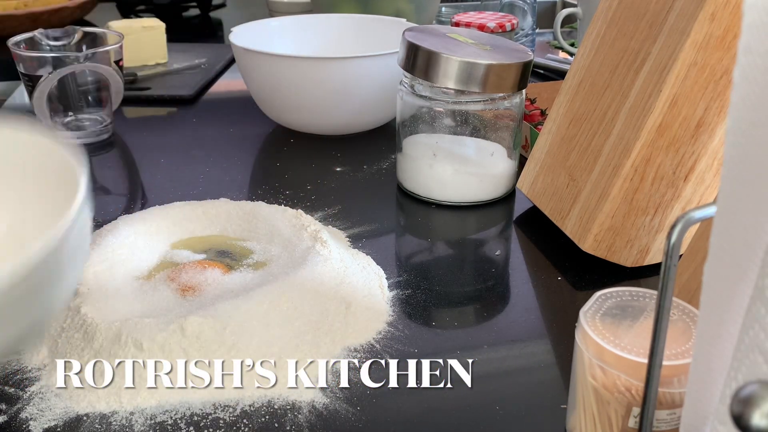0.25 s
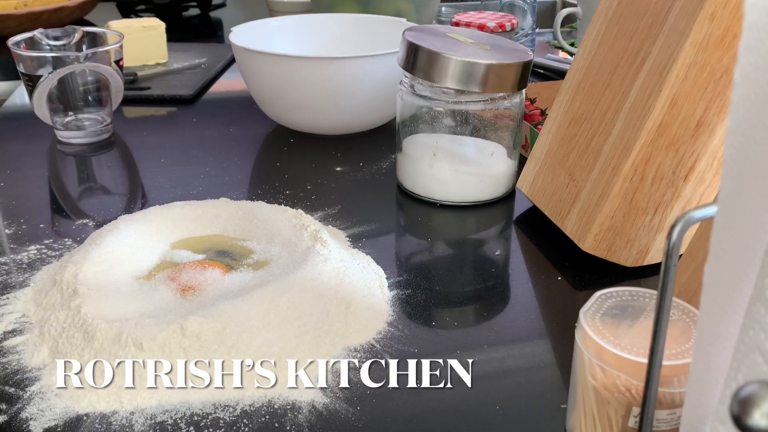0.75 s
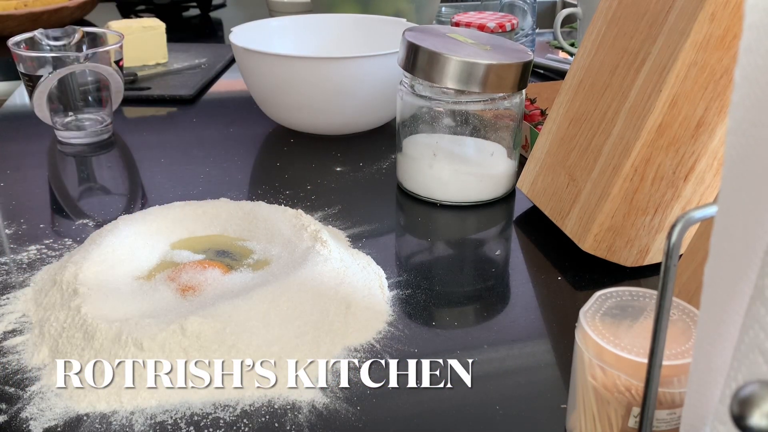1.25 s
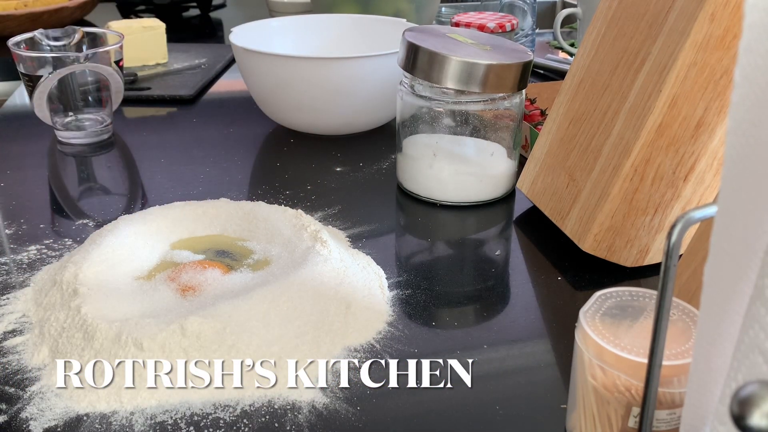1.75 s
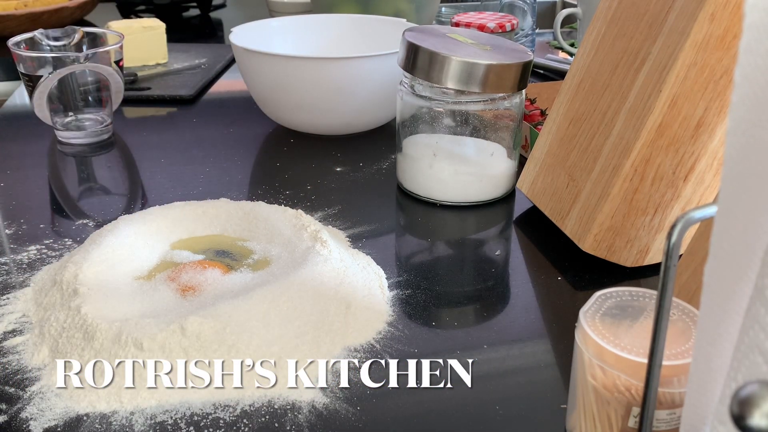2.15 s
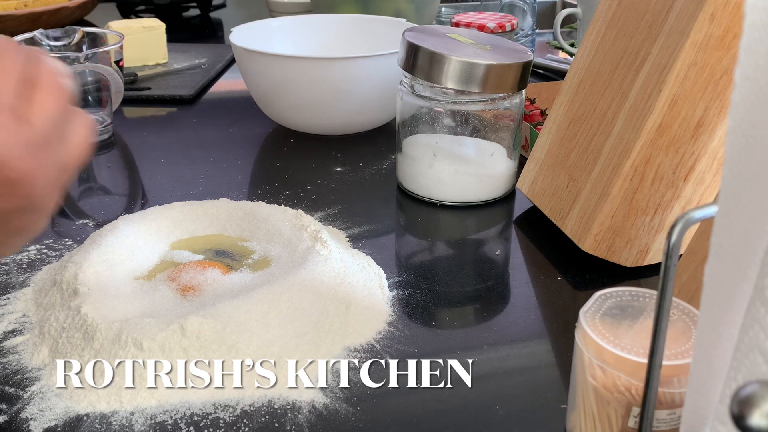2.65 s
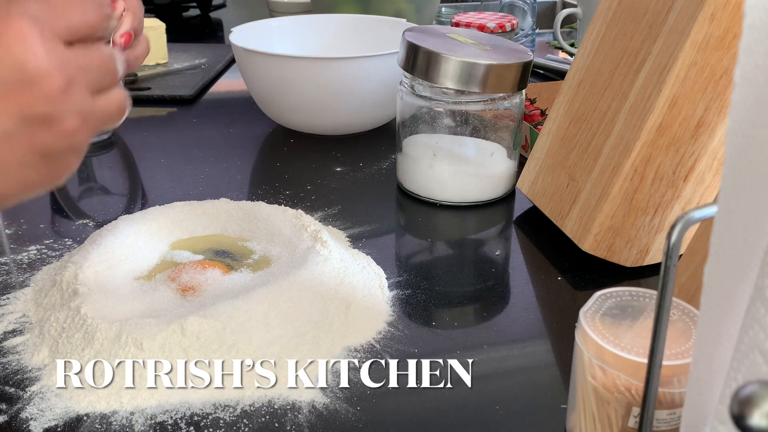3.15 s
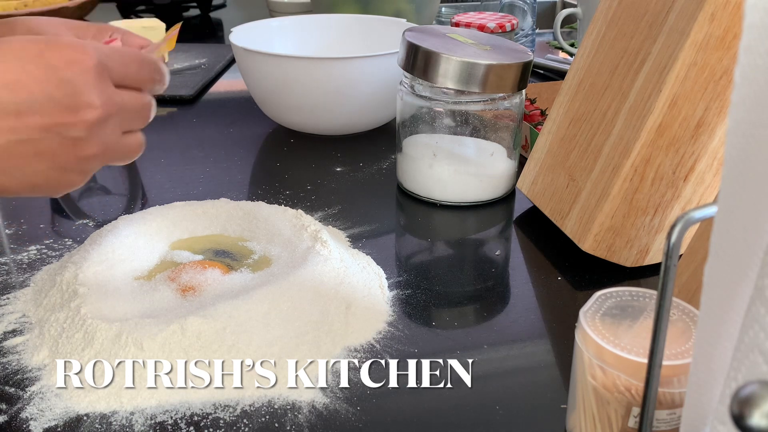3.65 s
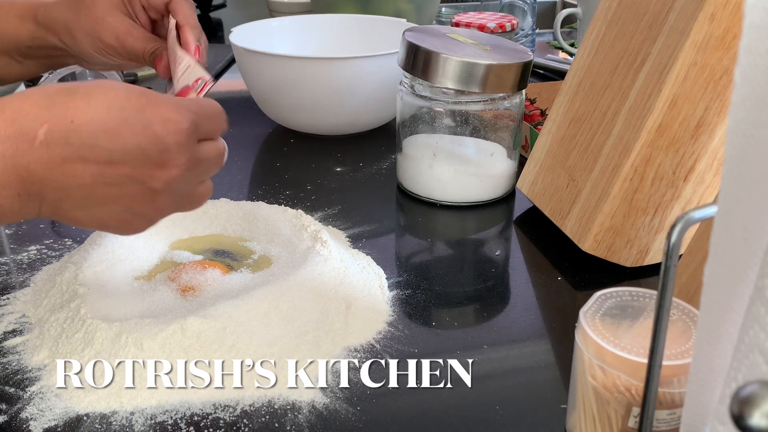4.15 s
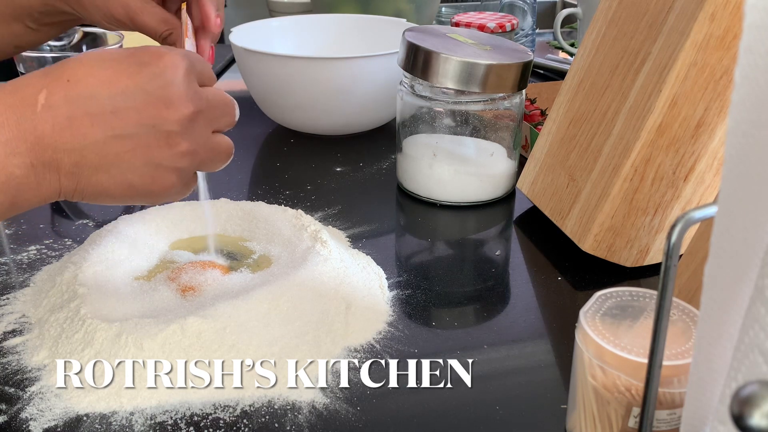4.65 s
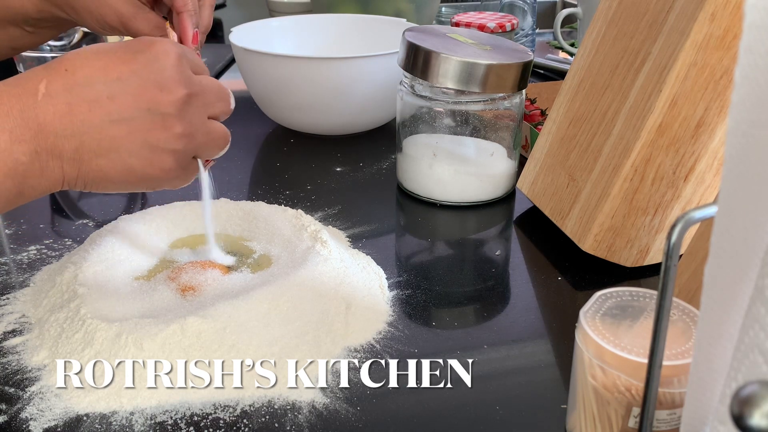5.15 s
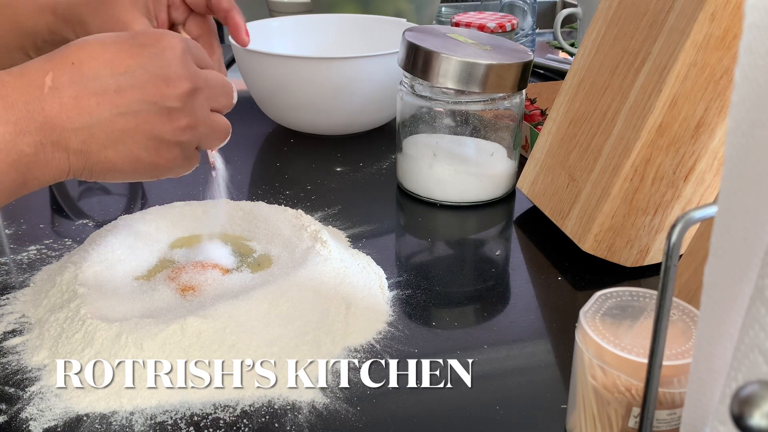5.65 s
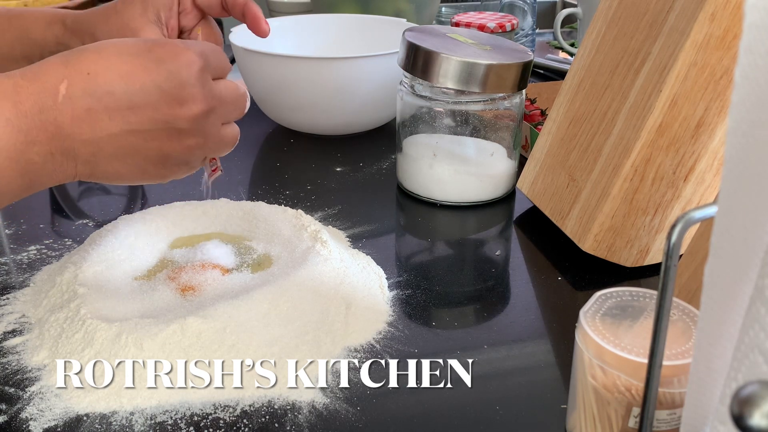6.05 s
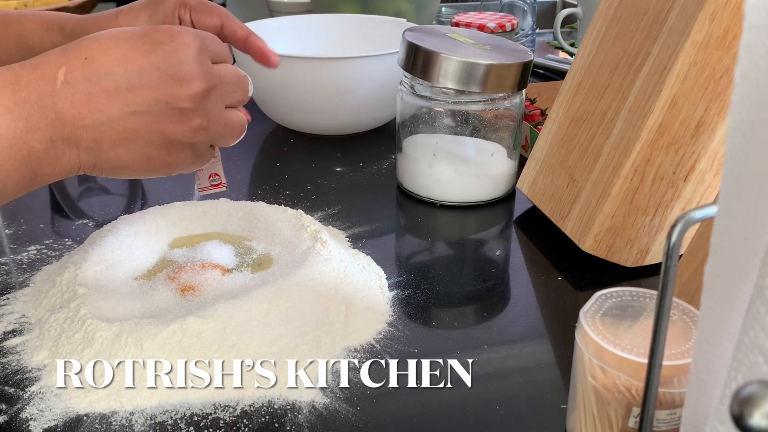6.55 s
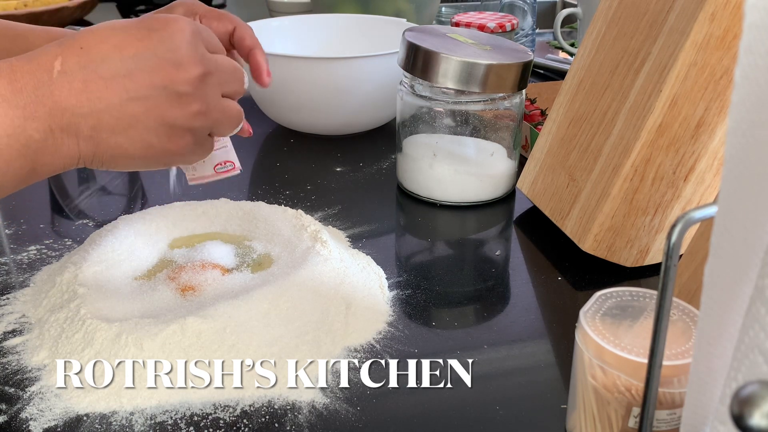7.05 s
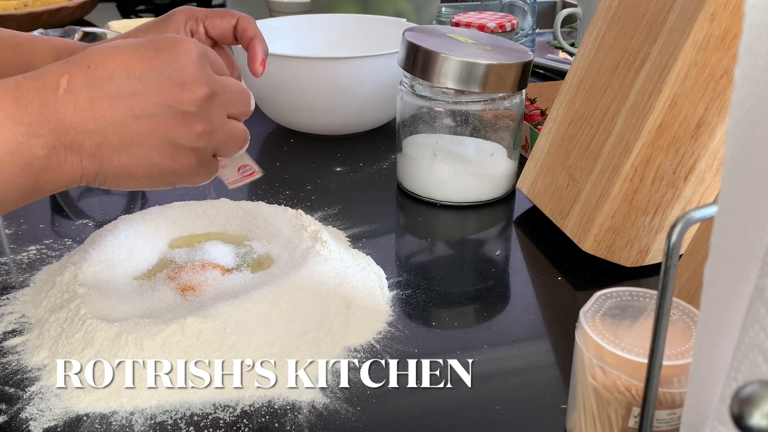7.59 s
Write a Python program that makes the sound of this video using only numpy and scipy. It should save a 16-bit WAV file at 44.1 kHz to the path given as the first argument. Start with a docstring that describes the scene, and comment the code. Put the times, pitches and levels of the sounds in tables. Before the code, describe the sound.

A bowl is set down on a stone counter with a quick clatter and a brief ring. Much quieter paper sounds follow: a small sachet crackles, rips open in one short pull and lets out a soft hiss of sugar. It ends with busier crinkling as the last grains are shaken loose. Everything is heard up close over a kitchen's faint low hum and short echo.

```python
"""In a softly humming, echoing kitchen, a carried bowl clinks faintly, then knocks on the stone counter
and rattles to rest (0.7 s). Fingers pick up a small paper sachet, which crinkles and snaps (1.3 s).
They tear off its top (2.7 s), pinch it open and pour hissing sugar onto soft flour (3.9 to 6 s).
Last, they shake and crinkle the final grains out. Two close microphone ports hear it all."""
import sys
import numpy as np
from scipy import signal
from scipy.fft import rfft, irfft
from scipy.io import wavfile
from scipy.ndimage import uniform_filter1d

SR = 44100
rng = np.random.default_rng(int(sys.argv[2]) if len(sys.argv) > 2 else 0)


def digitize_waveform(pressure):
    """Quantize a signal to 16-bit integers and store it at the path in sys.argv[1].

    Rows of a 2-D input are taken as channels; values are limited to [-1, 1].
    """
    field = np.atleast_2d(pressure).T
    bounded = np.clip(field, -1, 1)
    quanta = np.round(bounded * 32767).astype(np.int16)
    wavfile.write(sys.argv[1], SR, quanta)


N = 344970
TIME = np.arange(N) / SR
ONE_SECOND = np.arange(SR) / SR
HZ = np.fft.rfftfreq(N, 1 / SR)


def gain_of(db):
    """Turns decibels into a number to multiply a sound by."""
    return 10 ** (np.asarray(db) / 20)


def evened(x):
    """Scales a signal to an average power of 1."""
    return x / np.sqrt(np.mean(x ** 2) + 1e-20)


def look_up(table, hz):
    """Reads between the rows of a frequency table, giving each octave equal room."""
    row_hz, value = np.transpose(table)
    return np.interp(np.log(hz + 1), np.log(row_hz + 1), value)


def add(mix, start, sound):
    """Adds a sound to the mix, starting at a time in seconds."""
    part = mix[:, round(start * SR):][:, :sound.shape[-1]]
    part += sound[..., :part.shape[-1]]


def noise(spectrum):
    """Two unrelated noises, left and right, with the same tone colour."""
    return evened(irfft(rfft(rng.standard_normal((2, N))) * spectrum, N))


def swell(peak, length):
    """A smooth rise and fall around the peak time."""
    return np.exp(-(2 * (TIME - peak) / length) ** 2)


def loudness(curve, fade_s=0.18):
    """Follows a table of levels over time, fading in before it and out after it."""
    times, db = np.transpose(curve)
    outside_s = np.maximum(np.maximum(times[0] - TIME, TIME - times[-1]), 0)
    return gain_of(np.interp(TIME, times, db) - 60 * outside_s / fade_s)


def grains(per_s, length_s, spread_db):
    """Countless tiny bursts of uneven size: multiply a noise by this to make it gritty."""
    sizes = gain_of(spread_db * np.minimum(rng.exponential(1, N), 4.5))
    power = sizes ** 2 * (rng.random(N) < per_s / SR)
    power = np.abs(uniform_filter1d(power, max(int(length_s * SR), 2)))
    average = np.abs(uniform_filter1d(power, SR // 8))
    return np.sqrt(power / (average + 1e-9))


# tone colour of the quiet kitchen: (frequency [Hz], level [dB])
ROOM_COLOUR = [(20, -22), (40, -3.5), (65, 0.5), (130, -4.5), (220, 1.5), (330, -11.5), (600, -19.5),
               (1100, -21), (1800, -26), (5000, -26.5), (12000, -26.5), (16000, -30.5)]

def room_hum(level_db=-73.5):
    """The room hums low under a faint hiss the whole time."""
    return gain_of(level_db) * noise(gain_of(look_up(ROOM_COLOUR, HZ)))


# how long the kitchen echoes: (frequency [Hz], time to fade by 60 dB [s])
ECHO_FADE = [(100, 0.18), (300, 0.45), (1100, 0.63), (2500, 0.79), (5000, 0.24), (9000, 0.29),
             (16000, 0.14)]

def kitchen_echo(sound, build_up_s, treble_db):
    """Tiles and cupboards throw back a blur of echoes, each pitch dying at its own speed."""
    t = ONE_SECOND
    echoes = rng.standard_normal((2, SR)) * (rng.random((2, SR)) < .12)
    hz, frame_s, spectrum = signal.stft(echoes, SR, nperseg=256)
    colour_db = treble_db * np.clip(np.log2((hz + 1) / 2000) / 2, 0, 1)
    spectrum *= gain_of(colour_db[:, None] - 60 * frame_s / look_up(ECHO_FADE, hz)[:, None])
    onset = 1 - np.exp(-np.maximum(t - .003, 0) / build_up_s)
    tail = signal.istft(spectrum, SR, nperseg=256)[1][:, :SR] * onset
    tail /= np.linalg.norm(echoes[0] * gain_of(-60 * t / 0.73))
    return signal.fftconvolve(sound, tail, axes=1)[:, :N]


def blow(rise_s=0.00069, decay_s=0.0042):
    """The force of one hit jumps up and quickly dies away."""
    return np.exp(-ONE_SECOND / decay_s) * (1 - np.exp(-ONE_SECOND / rise_s))


def ring(tones, rise_s):
    """A struck object's tones start together and fade; left and right are a quarter cycle apart."""
    t = ONE_SECOND
    wave = sum(gain_of(db - 60 * t / fade_s) * np.exp(2j * np.pi * hz * t) for hz, db, fade_s in tones)
    wave *= np.sqrt(2) * (1 - np.exp(-t / rise_s))
    return np.array([wave.imag, wave.real])


# faint clinks of the carried bowl: (time [s], level [dB])
CLINKS = [(.09, -72), (0.184, -52.5), (.224, -74.5)]
# the tones in a clink: (frequency [Hz], level [dB], time to fade by 60 dB [s])
CLINK_TONES = [(1100, -10, .12), (2730, 0, .05), (2755, -13, .25), (4800, -13, .1), (6690, -7, .12)]

def clinks(tick_db=-4, ring_db=-7):
    """Each light touch on the carried bowl makes a noisy tick and a short ring."""
    sound = np.zeros((2, N))
    ringing = gain_of(ring_db) * ring(CLINK_TONES, rise_s=0.0013)
    for start, db in CLINKS:
        tick = gain_of(tick_db) * blow() * rng.standard_normal((2, SR))
        add(sound, start, gain_of(db) * (tick + ringing))
    return sound


def flexing(sound, spread_db=3.5, patch_hz=400, patch_s=.022):
    """Bending paper keeps changing which pitches it favours, in random drifting patches."""
    spectrum = signal.stft(sound, nperseg=512, noverlap=384)[2]
    patches = rng.standard_normal(spectrum.shape[1:])
    for axis, size in enumerate([patch_hz * 512 / SR, patch_s * SR / 128]):
        for _ in range(2):
            patches = uniform_filter1d(patches, max(round(size), 2), axis)
    spectrum *= gain_of(spread_db * evened(patches))
    return evened(signal.istft(spectrum, nperseg=512, noverlap=384)[1][:, :N])


# tone colour of the paper: (frequency [Hz], level [dB])
PAPER_COLOUR = [(100, -18.5), (300, -11.5), (600, -8.5), (1000, -1.5), (2000, 0), (4200, 3.5), (6000, 0.5),
                (8500, 2.5), (10500, 1), (13500, -2), (15800, -7.5)]

def paper_noise(share=1, right_delay_s=.00018):
    """Noise coloured by the sachet. It is held to the left, so its lower tones arrive there first."""
    left, unrelated = rfft(noise(gain_of(look_up(PAPER_COLOUR, HZ)) * share))
    likeness = look_up([(4500, .65), (6500, 0)], HZ)
    delayed = left * np.exp(-2j * np.pi * HZ * right_delay_s)
    right = likeness * delayed + np.sqrt(1 - likeness ** 2) * unrelated
    return flexing(irfft(np.array([left, right]), N))


def paper_bands(body_top_hz=2200, crackle_top_hz=7000):
    """Paper noise in three ranges: low body, middle crackle and high fizz."""
    above_body = 1 / (1 + (body_top_hz / (HZ + 1)) ** 6)
    above_crackle = 1 / (1 + (crackle_top_hz / (HZ + 1)) ** 8)
    shares = [1 - above_body, above_body * (1 - above_crackle), above_crackle]
    return [paper_noise(np.sqrt(share)) for share in shares]


def blend(bands, body_db, fizz_db):
    """Mixes the paper's three ranges, turning body and fizz up or down against the crackle."""
    body, crackle, fizz = bands
    return gain_of(body_db) * body + crackle + gain_of(fizz_db) * fizz


# soft swells of hiss as the bowl rattles and settles, and later as the sachet is handled:
# (peak time [s], length [s], level [dB])
HISS_SWELLS = [(0.639, 0.03, -59.5), (0.83, 0.2, -59), (1.159, 0.068, -57.5), (2.244, 0.02, -42.5),
               (2.553, 0.05, -46), (3.045, 0.036, -51), (3.41, 0.089, -56.5), (3.95, 0.051, -53),
               (4.404, 0.17, -56), (5.235, 0.051, -55), (5.35, .04, -59), (5.665, 0.075, -51.5),
               (6.231, 0.052, -54), (6.349, 0.056, -47), (6.839, 0.018, -49), (6.981, 0.038, -46),
               (7.522, 0.09, -50.5)]
# sliding fingers: (peak time [s], length [s], frequency [Hz], spread to each side [Hz], level [dB])
RUBS = [(0.671, 0.074, 3230, 690, -60.5), (1.573, 0.22, 3400, 900, -57.5), (2.247, 0.036, 2350, 450, -50),
        (2.436, 0.14, 2450, 348, -62.5), (2.543, 0.052, 2820, 490, -52.5), (2.789, 0.092, 2220, 703, -59),
        (2.89, 0.067, 872, 167, -57.5), (2.961, 0.051, 800, 397, -49.5), (3.408, 0.042, 1645, 325, -55),
        (3.799, 0.31, 582, 334, -67), (3.93, 0.1, 1400, 400, -64.5), (4.379, .15, 4140, 489, -60),
        (4.413, .14, 447, 199.7, -68), (6.36, 0.032, 4500, 500, -48.5)]

def swells_and_rubs():
    """Hiss swells and fades; finger rubs make a surface or the sachet's hollow sound near one pitch."""
    sound = sum(gain_of(db) * swell(peak, length) for peak, length, db in HISS_SWELLS) * paper_noise()
    for peak, length, hz, spread_hz, db in RUBS:
        resonance = 1 / (1 + ((HZ - hz) / spread_hz) ** 2)
        sound += gain_of(db) * swell(peak, length) * noise(resonance)
    return sound * grains(per_s=1900, length_s=0.0036, spread_db=1.5)


# paper buckles (dull, brightness below 0) or its fibres snap (crisp, above 0):
# (time [s], crackle level [dB], brightness [dB])
SNAPS = [(0.657, -57, -7.5), (1.311, -37.5, -7), (1.4186, -53.5, -17), (1.4865, -41, -8.5),
         (1.5844, -49, -3), (1.6682, -50.5, -10.5), (1.7335, -52, -15), (1.7449, -50, -11),
         (1.8941, -53, -11.5), (2.0311, -57, -4), (2.2335, -41.5, 4.5), (2.4351, -57.5, -4),
         (2.5547, -44.5, 8.5), (2.663, -51.5, 10), (2.6928, -50, 13), (2.7194, -37, -1), (2.9422, -36.5, 1),
         (3.168, -57, 6.5), (3.3746, -42.5, 0.5), (3.3909, -51.5, 6), (3.4393, -46.5, 4.5),
         (3.5932, -51.5, 7), (3.6119, -43, -6.5), (3.6247, -47.5, -3.5), (3.7235, -58.5, -20),
         (3.858, -48.5, -6.5), (3.8925, -55.5, 20), (4.1776, -38.5, -2), (4.3403, -39, -3.5),
         (4.732, -41, -2), (4.8308, -41, 5), (4.906, -51, -5), (4.9673, -47, -1.5), (5.1742, -59, 0),
         (5.2956, -46.5, 7), (5.3408, -49, -3), (5.445, -56, -1), (5.6777, -49, -8), (5.8839, -48.5, 4),
         (6.0618, -47, -0.5), (6.0817, -50, 5), (6.1303, -48.5, 10), (6.321, -54.5, -12), (6.4704, -50, -1),
         (6.592, -42.5, 4), (6.7308, -60.5, 6), (6.8045, -43.5, 4), (6.8671, -42.5, 3), (6.88, -65, -1),
         (6.9501, -41, -6), (6.968, -41, 8), (6.9767, -36, 4), (6.9858, -40, 7), (7.0887, -36.5, 14),
         (7.1745, -45, -6.5), (7.216, -46.5, -5), (7.3014, -42.5, -2.5), (7.3238, -44.5, 4),
         (7.4433, -45.5, -1), (7.4907, -41.5, 1), (7.571, -45, -6), (7.638, -51.5, 1),
         (7.6995, -43.5, -4.5)]

def paper_snaps(bands, boost_db=1, burst_s=0.002, flutter_db=-16, flutter_decay_s=0.022, echo_db=-3):
    """Paper gives way in one short burst, then flutters while three smaller creases follow."""
    t = np.arange(SR // 20) / SR
    flutter_power = gain_of(flutter_db) ** 2 * np.exp(-2 * t / flutter_decay_s) * (t > burst_s)
    body, crackle, fizz = np.zeros((3, 1, N))
    for start, db, bright_db in SNAPS + small_creases():
        followers = [(0.002973 + 0.032 * lag ** 2, -15 - 9 * drop) for lag, drop in rng.random((3, 2))]
        burst_power = sum(gain_of(size_db) ** 2 * np.exp(-(2 * (t - delay) / burst_s - 1) ** 6)
                          for delay, size_db in [(0.0022, 0)] + followers)
        shape = np.sqrt(flutter_power + burst_power)
        # a brighter snap has less body and more fizz
        add(body, start, gain_of(db - 8 - 0.9 * bright_db) * shape)
        add(crackle, start, gain_of(db) * shape)
        add(fizz, start, gain_of(db + 0.5 + 0.76 * bright_db) * shape)
    direct = gain_of(boost_db) * sum(amount * band for amount, band in zip((body, crackle, fizz), bands))
    return direct + gain_of(echo_db) * kitchen_echo(direct, build_up_s=0.00023, treble_db=0.5)


# the bowl's foot hits the counter: (time [s], knock level [dB], glassy ring level [dB])
KNOCKS = [(0.7195, -8.5, -26.5), (0.7605, -12, -29.5), (0.7816, -16, -41), (0.794, -20, -41),
          (0.8042, -26.5, -39), (0.907, -30, -50.5), (0.9435, -13, -22), (0.949, -14, -28.5),
          (0.9605, -14, -28.5), (0.9705, -15, -30)]
# the bowl's short main tones: (frequency [Hz], level [dB], time to fade by 60 dB [s])
BODY_TONES = [(1094, -3.5, 0.04), (944, -7.5, .018), (1821, -9.5, 0.019), (2191, -9.5, 0.014),
              (2757, -24, 0.0033)]
# lingering tones of bowl and counter: (frequency [Hz], level [dB], time to fade by 60 dB [s])
LINGERING_TONES = [(191, -32.5, 0.37), (238.6, -28, 0.424), (514, -31.5, .4), (717, -35, 0.88),
                   (850, -21.5, .4), (1030, -21.5, 0.18), (1138, -16.5, 0.2), (1105, -24.5, 0.64),
                   (1522, -33, 0.96), (1660, -40, .5)]
# the bowl's high, glassy tones: (frequency [Hz], level [dB], time to fade by 60 dB [s])
GLASSY_TONES = [(3850, -21, .3), (4172, -22, 0.17), (6700, -8.5, 0.096), (6734, -1.5, 0.031),
                (9930, -9.5, 0.035), (9930, 0, .04), (12000, -19.5, .03), (13700, -21, .025)]
# tone colour of the counter's thud: (frequency [Hz], level [dB])
THUD_COLOUR = [(30, -22), (70, -12.5), (180, -4.5), (400, -6), (750, 0), (1300, -3), (2200, -10.5),
               (3200, -15), (5000, -29), (8000, -36), (15000, -50.5)]

def bowl(body_db=4, linger_db=-4, glassy_db=-2, thud_db=-6, tone_echo_db=-7, thud_echo_db=5):
    """After the clinks, each knock rings the bowl and thuds in the counter; the room answers loudly."""
    tone = clinks()
    blows = np.zeros((2, N))
    for start, knock_db, ring_db in KNOCKS:
        add(tone, start, gain_of(knock_db + body_db) * ring(BODY_TONES, rise_s=0.00044))
        add(tone, start, gain_of(knock_db + linger_db) * ring(LINGERING_TONES, rise_s=0.0089))
        add(tone, start, gain_of(ring_db + glassy_db) * ring(GLASSY_TONES, rise_s=.0001))
        add(blows, start, gain_of(knock_db + thud_db) * blow())
    bursts = blows * rng.standard_normal((2, N))
    thud = irfft(rfft(bursts) * evened(gain_of(look_up(THUD_COLOUR, HZ))), N)
    into_room = gain_of(tone_echo_db) * tone + gain_of(thud_echo_db) * thud
    return tone + thud + kitchen_echo(into_room, build_up_s=0.0031, treble_db=-0.5)


# how hard the fingers work the sachet: (time [s], level [dB])
HANDLING = [(1.25, -68.5), (1.7, -72.5), (1.98, -74), (2.15, -85.5), (2.4, -69), (2.65, -68), (3.08, -65),
            (3.22, -72.5), (3.56, -72.5), (3.9, -68.5), (4.7, -74.5), (5.2, -68.5), (5.5, -80), (6.05, -71),
            (6.449, -68), (6.78, -68), (7.1, -57), (7.4, -67), (7.82, -62)]

def crinkle(bands):
    """The paper crinkles under the fingers, louder the harder they work it."""
    paper = blend(bands, body_db=-4.5, fizz_db=-5.5)
    return loudness(HANDLING) * paper * grains(per_s=1600, length_s=0.0043, spread_db=3.5)


def small_creases(per_s=12, above_handling_db=6, size_spread_db=0.5, bright_spread_db=8, slot_s=.02):
    """Creases give way at random, louder with harder handling; returns rows like those of SNAPS."""
    times, effort_db = np.transpose(HANDLING)
    slots = np.arange(times[0], times[-1], slot_s)
    chance, offset = rng.random((len(slots), 2)).T
    size, brightness = rng.standard_normal((len(slots), 2)).T
    db = np.interp(slots, times, effort_db) + above_handling_db + size_spread_db * size
    rows = np.transpose([slots + slot_s * offset, db, bright_spread_db * brightness])
    return rows[chance < per_s * slot_s].tolist()


def tear(bands, start_s=2.69, length_s=.22, rise_s=.04, decay_s=0.016, gain_db=-56):
    """The top comes off in one steady pull, its fibres parting in a dense, bright run."""
    t = TIME - start_s
    pull = np.clip(t / rise_s, 0, 1) * np.exp(-np.maximum(t - length_s, 0) / decay_s)
    paper = blend(bands, body_db=-16, fizz_db=7.5)
    return gain_of(gain_db) * pull * paper * grains(per_s=2500, length_s=0.0048, spread_db=3.5)


# flow of sugar as the sachet tips and empties: (time [s], level [dB])
SUGAR_FLOW = [(3.87, -85), (4.01, -57), (4.13, -72), (4.41, -53), (4.68, -66.5), (4.92, -58.5), (5.1, -72),
              (5.7, -62), (6.05, -83)]

def sugar(bands):
    """Crystals slide out over the paper in a fine hiss; they land silently on the flour."""
    paper = blend(bands, body_db=-19.5, fizz_db=3.5)
    return loudness(SUGAR_FLOW) * paper * grains(per_s=2700, length_s=0.0027, spread_db=1)


def scene(rustle_echo_db=-7):
    """Bowl, room and sachet together."""
    bands = paper_bands()
    bowl_and_room = bowl() + room_hum()
    rustle = crinkle(bands) + swells_and_rubs() + tear(bands) + sugar(bands)
    rustle_echo = gain_of(rustle_echo_db) * kitchen_echo(rustle, build_up_s=0.0014, treble_db=6.5)
    return bowl_and_room + rustle + rustle_echo + paper_snaps(bands)


# how much of the left port's sound the right one shares: (frequency [Hz], likeness [0 to 1])
PORT_LIKENESS = [(60, .85), (180, .7), (400, .2), (700, 0), (5500, 0), (7000, .7), (8400, .99), (9800, .8),
                 (11000, .97), (12200, .85), (13400, .99), (14500, .7), (15500, .95)]
# how far the wave at the right port runs ahead: (frequency [Hz], lead [cycles])
RIGHT_LEAD = [(6300, 0), (8200, .46), (8800, .53), (10000, .82), (10500, 1), (11600, 1), (13100, 1.48),
              (13900, 1.52), (15100, 2)]
# how much louder the left port is: (frequency [Hz], left minus right [dB])
LEFT_LEAN = [(60, 1), (200, -3), (550, 0.5), (1200, 1), (2800, 1), (5500, -2.5), (8000, -0.5)]

def record(dry, low_cut_hz=40, high_cut_hz=15950):
    """Two close microphone ports (openings) share bass and treble; the very lows and highs are cut."""
    left, right = rfft(dry)
    likeness = look_up(PORT_LIKENESS, HZ)
    right = likeness * left + np.sqrt(1 - likeness ** 2) * right
    lead_cycles = np.interp(HZ, *np.transpose(RIGHT_LEAD))
    right *= np.exp(2j * np.pi * lead_cycles)
    lean_db = look_up(LEFT_LEAN, HZ)
    ports = irfft(np.array([left * gain_of(lean_db / 2), right * gain_of(-lean_db / 2)]), N)
    low_cut = signal.butter(2, low_cut_hz, "highpass", fs=SR, output="sos")
    high_cut = signal.firwin(401, high_cut_hz, window=("kaiser", 8), fs=SR)
    return signal.oaconvolve(signal.sosfilt(low_cut, ports), high_cut[None], "same")


dry = scene()
out = record(dry)
digitize_waveform(out)
```